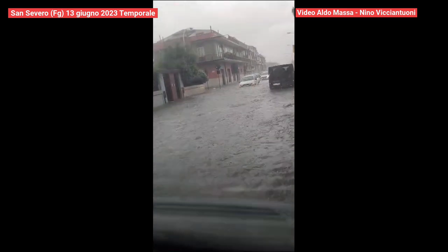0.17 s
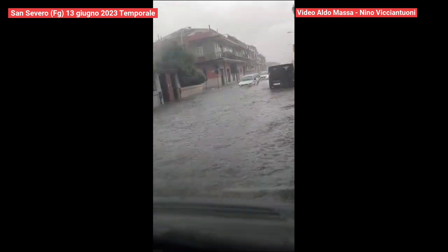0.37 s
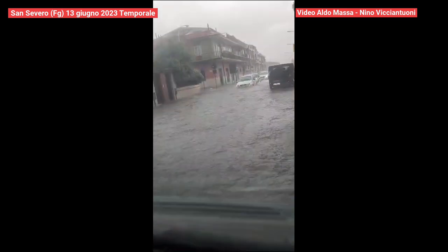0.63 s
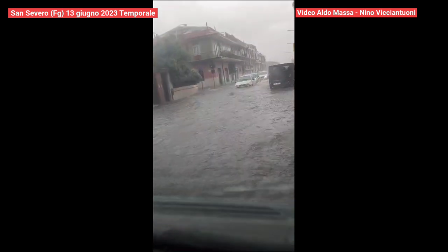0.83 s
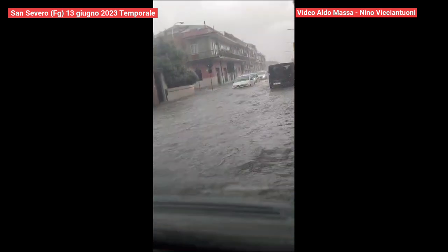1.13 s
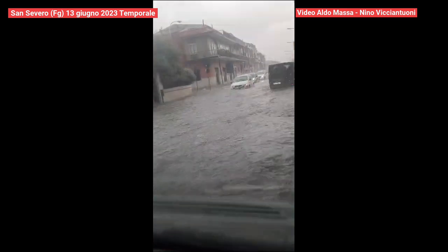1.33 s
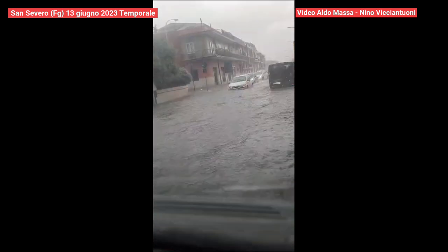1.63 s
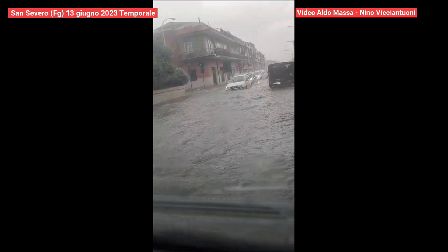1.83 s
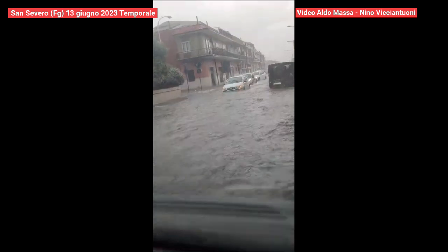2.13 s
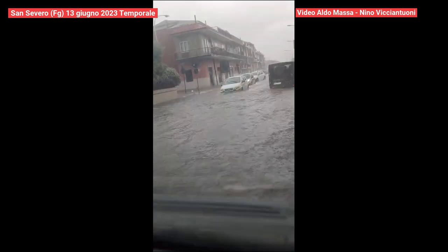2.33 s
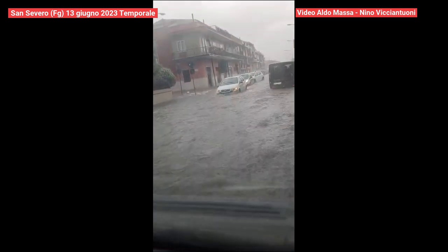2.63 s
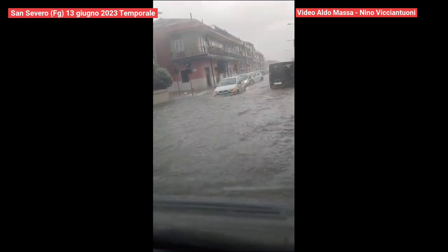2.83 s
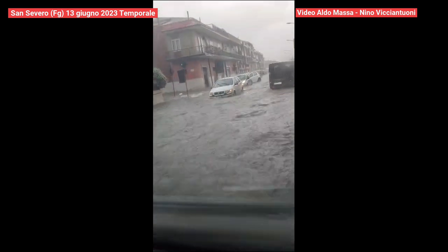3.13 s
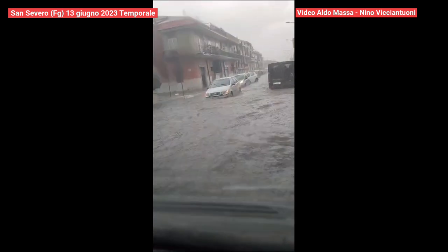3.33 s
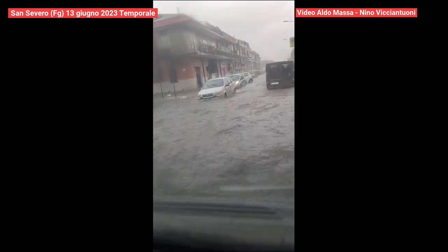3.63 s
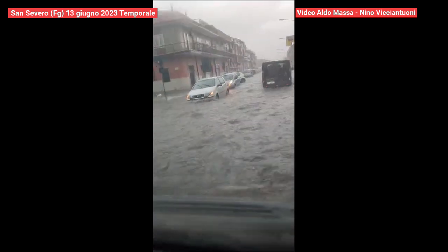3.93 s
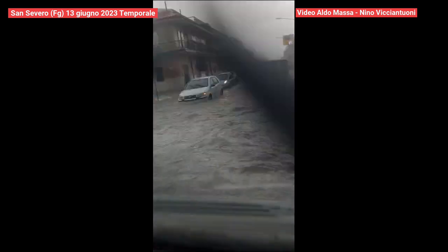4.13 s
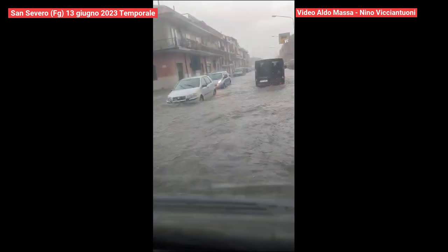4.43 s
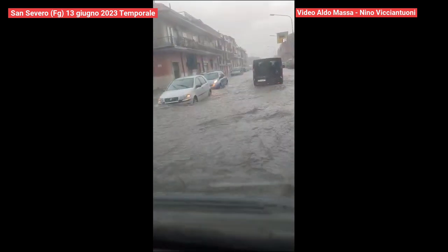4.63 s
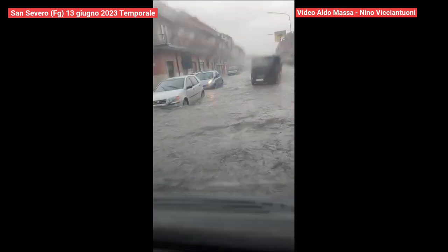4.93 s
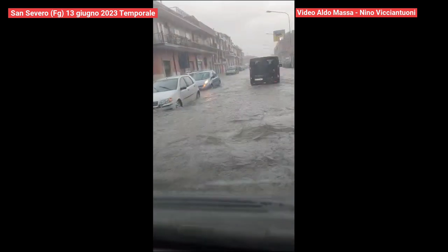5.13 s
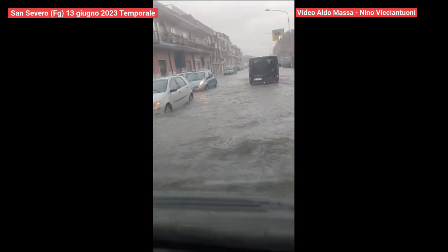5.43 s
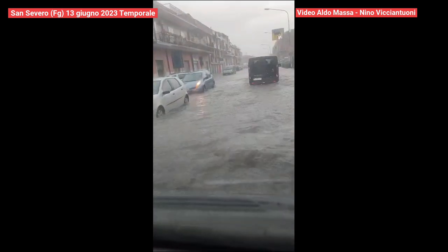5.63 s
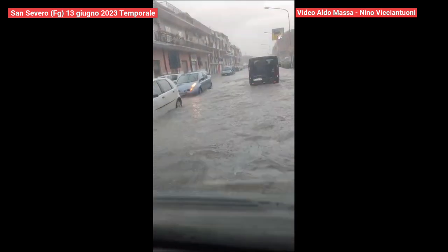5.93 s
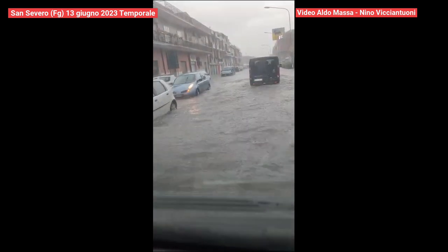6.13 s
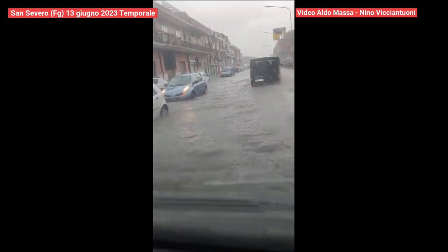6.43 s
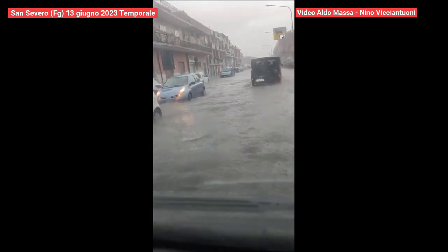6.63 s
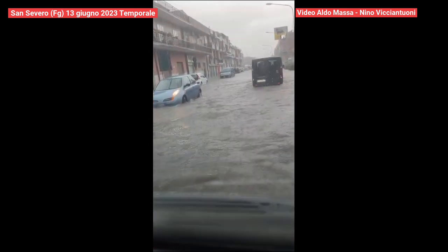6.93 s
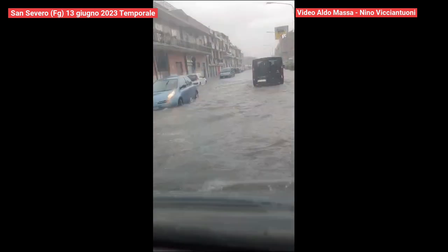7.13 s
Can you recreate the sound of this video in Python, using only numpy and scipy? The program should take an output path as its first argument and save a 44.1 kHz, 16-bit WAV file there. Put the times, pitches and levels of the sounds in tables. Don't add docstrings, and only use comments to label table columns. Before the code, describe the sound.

Low muffled rumble of water beneath a slow car, steady engine and fan drone, faint rain and spray, ticking relay, dull thuds and drops on glass.

```python
import sys
import numpy as np
from scipy import signal
from scipy.fft import rfft, irfft, next_fast_len
from scipy.io import wavfile
from scipy.ndimage import uniform_filter1d

SR = 44100
rng = np.random.default_rng(int(sys.argv[2]) if len(sys.argv) > 2 else 0)


def unload_wav(signal):
    wavfile.write(
        sys.argv[1],
        SR,
        np.round(np.clip(np.atleast_2d(signal).T, -1, 1) * 32767).astype(np.int16),
    )


def invert_db(level):
    return 10 ** (np.asarray(level, dtype=float) / 20)


N = 320739
TIME = np.arange(N) / SR
HZ = np.fft.rfftfreq(next_fast_len(N), 1 / SR)

# start_s, peak_db, panel_hz, second_panel_hz, second_panel_db
THUMP_EVENTS = [(0.139, -17.5, 121, 155, -15), (0.418, -15, 115, 169, -6), (0.952, -26, 124, 150, -21),
                (1.198, -18, 119, 160, -10), (1.359, -16.5, 115, 152.5, 2.5),
                (1.699, -24.5, 138, 170.5, -2), (2.339, -15.5, 108.5, 148, -16),
                (3.295, -11.5, 123, 148, -12), (4.247, -12, 119.5, 150, -15), (5.2, -12, 110.8, 166, -22),
                (5.58, -18.5, 123, 160, -9), (6.15, -13, 121, 169.4, -20), (6.499, -20, 105.3, 157, 1),
                (7.119, -14, 110, 169, -4.5)]


def on_hz(table):
    hz, value = np.transpose(table)
    return np.interp(np.log(HZ + 1), np.log(hz + 1), value)


def curves(table):
    s, *columns = np.transpose(table)
    return [np.interp(TIME, s, column) for column in columns]


def walk(rate):
    hold = int(SR / rate)
    steps = np.repeat(rng.standard_normal(N // hold + 1), hold)
    return 1.2 * uniform_filter1d(uniform_filter1d(steps, hold), hold)[:N]


def sides(db):
    return invert_db(np.array([db, -db]) / 2)


def pan(db):
    return sides(np.array([db]))


def place(out, s, sound):
    k = int(s * SR)
    return out + np.pad(sound[:, :N - k], ((0, 0), (k, max(N - k - sound.shape[1], 0))))


def blower():
    # multiple, rms_db, left_minus_right_db
    shaft_orders = [(2, -33.5, -2), (3, -28.5, 7), (4, -36.5, 11), (5, -39.5, 3.5), (6, -41.5, -6),
                    (7, -50, 0), (8, -48, -2), (9, -46, -6), (10, -55, -12)]
    shaft_hz = 59.35
    turn = 2 * np.pi * np.cumsum(shaft_hz * (1 + 0.0029 * walk(3))) / SR
    hum = 0
    for k, db, side_db in shaft_orders:
        level = np.sqrt(2) * invert_db(db + 0.92 * walk(7))
        hum = hum + level * np.sin(k * turn + k ** 2) * pan(side_db)
    return hum


def engine():
    # time_s, firing_rate_hz
    firing_rate = [(0, 57.6), (2, 56.45), (2.5, 55.04), (4, 55.12), (5, 53.85), (6, 51.92), (7.27, 51.66)]
    first_db, octave_db, boom_db_per_hz = -28.5, -28, 1.12
    hz = curves(firing_rate)[0]
    turn = 2 * np.pi * np.cumsum(hz * (1 + 0.0118 * walk(10))) / SR
    firing = np.sin(turn) * invert_db(first_db + boom_db_per_hz * (hz[0] - hz) + walk(9))
    octave = np.sin(2 * turn) * invert_db(octave_db + walk(9))
    return np.sqrt(2) * (firing + octave) * pan(1.2)


def waves():
    # centre_s, peak_db, pitch_hz, length_s
    lifts = [(0.326, -19, 21, .3), (.95, -28, 30, 0.18), (1.918, -17.5, 33.6, .3), (2.472, -22, 29.5, .2),
             (2.924, -16, 28.1, .3), (3.48, -11.5, 21.95, .35), (4.052, -21, 23, 0.26),
             (5.233, -26, 32, .15), (6.304, -21, 22, .3)]
    out = np.zeros((2, N))
    for s, db, hz, length in lifts:
        t = TIME[:int(length * SR)]
        swing = invert_db(db) * np.sin(np.pi * t / length) ** 2 * np.sin(2 * np.pi * hz * t)
        out = place(out, s - length / 2, np.array([swing, swing]))
    return out


def unit(sound):
    return sound / np.std(sound[..., :400], axis=-1, keepdims=True)


def relay():
    # start_s, level_db over the usual
    closings = [(.2533, -2), (1.2097, 0), (2.1636, 0), (3.1205, -.5), (4.0771, 0), (5.0308, .5),
                (5.9873, 0), (6.9426, 0)]
    # pitch_hz, left_db, right_db, t60_s
    housing = [(2050, -1, -9, .03), (2350, 0, 0, .025), (2520, -2, -1, .02), (2680, 1, 1, .03),
               (2880, -2, 1, .03), (3070, -6, -3, .025), (3280, 0, 2, .04), (3900, -17, -16, .015),
               (4750, -12, -12, .02), (6140, -18, -10, .015), (6580, -18, -10, .015)]
    click_db, snap_db = -26.5, -11.5
    chatter_s, cabin_share, cabin_s, snap_s = .009, .55, .022, .006
    new_share = .2
    t = TIME[:SR // 12]
    hz, left, right, t60 = np.transpose(housing)[:, :, None]
    ring = np.sin(2 * np.pi * hz * t) * invert_db(-60 * t / t60)
    weight = invert_db(np.array([left, right]))
    attack = 1 - np.exp(-t / .0003)
    chatter = attack * (np.exp(-(t / chatter_s) ** 2) + cabin_share * np.exp(-t / cabin_s))
    contact = signal.butter(4, (4400, 7300), "band", fs=SR, output="sos")
    mount = signal.butter(6, (1980, 7600), "band", fs=SR, output="sos")
    habit = rng.standard_normal((2, len(housing), 2 * len(t)))
    out = np.zeros((2, N))
    for s, db in closings:
        rattle = habit + new_share * rng.standard_normal(habit.shape)
        modes = signal.fftconvolve(rattle, ring[None], "valid", axes=2)[..., :len(t)] * chatter
        snap = signal.sosfilt(contact, rattle[:, 0])[:, -len(t):] * attack * np.exp(-t / snap_s)
        body = unit((weight * unit(modes)).sum(1)) * pan(-3.)
        strike = body + unit(snap) * invert_db(snap_db) * pan(-7.)
        out = place(out, s - .0006, signal.sosfilt(mount, strike) * invert_db(click_db + db) * pan(2))
    return out


def wipers():
    t, out = TIME[:SR // 4], np.zeros((2, N))
    swing = (1 - np.exp(-t / 0.015)) * invert_db(-60 * t / 0.16)
    for s, db, hz, upper_hz, upper_db in THUMP_EVENTS:
        body = np.sin(2 * np.pi * hz * t) + invert_db(upper_db) * np.sin(2 * np.pi * upper_hz * t)
        out = place(out, s, invert_db(db + 12.5) * swing * body * pan(.8))
    return out


def drops():
    # start_s, peak_db, brightness_db, left_minus_right_db
    fat_drops = [(0.4334, -27, -29, 4), (0.6704, -34, -23, -1.0), (0.816, -28, -22, -1.5),
                 (1.4504, -38, -22, -5), (1.4995, -31, -33, 2), (1.5509, -34, -27, -1.0),
                 (1.6237, -30, -27, -5), (1.764, -23, -28, 1), (1.8956, -26, -27, 0.0),
                 (1.9864, -35, -20, -3), (2.3594, -28, -27, 2), (2.3894, -26, -30, -1.0),
                 (3.7683, -31, -26, -0.5), (4.2774, -26, -28, 4), (4.3094, -36, -24, -3),
                 (4.6084, -31, -32, -0.5), (4.8404, -39, -21, 3), (5.0878, -22, -27, 0),
                 (5.1134, -28.5, -24, -10), (5.3522, -25, -32, -1.0), (5.5134, -33, -17, -6)]
    near_drops = [
        (4.1879, -27, -15, -5),
        (4.9447, -36, -5, -2),
    ]
    t, out = TIME[:SR // 25], np.zeros((2, N))
    knock_band = signal.butter(2, (1900, 3700), "band", fs=SR, output="sos")
    splash_band = signal.butter(2, (3800, 15500), "band", fs=SR, output="sos")
    for s, db, bright_db, side_db in list(fat_drops) + list(near_drops):
        burst = rng.standard_normal((2, 2, len(t)))
        knock = signal.sosfilt(knock_band, burst[0] * np.exp(-t / 0.0046)) * invert_db(4.0)
        impact = (t == 0) * 2.5 + .3 * burst[1] * np.exp(-t / .0009)
        splash = signal.sosfilt(splash_band, impact) * invert_db(bright_db + 9.0) * pan(-14.)
        out = place(out, s, invert_db(db) * (knock * pan(side_db) + splash))
    return out


def patter(rate, scatter_db, share, tail_s):
    hit = rng.random((2, N)) < rate / SR
    size = invert_db(scatter_db * np.minimum(rng.exponential(size=(2, N)), 2.5))
    envelope = signal.lfilter([1], [1, -np.exp(-1 / (tail_s * SR))], hit * size)
    envelope = envelope / np.sqrt(np.mean(envelope ** 2))
    share = np.clip(share, 0, 1)
    return rng.standard_normal((2, N)) * np.sqrt(1 - share + share * envelope ** 2)


def cabin_resonances():
    # pitch_hz, width_hz, left_db, right_db
    cabin_peaks = [(1970, 130, 3, 0), (3230, 160, -2, 3), (4800, 89, 4, 3), (6170, 170, -2, 0.5),
                   (6470, 270, 5.5, 0), (7200, 130, 4.5, 3.5)]
    db = 0
    for hz, width, left, right in cabin_peaks:
        db = db + np.array([[left], [right]]) / (1 + (2 * (HZ - hz) / width) ** 2)
    return invert_db(db)


def water(colour, level_db, drive, swell_db, flicker_db, flicker_rate):
    # pitch_hz, left_minus_right_db
    port_tilt = [(30, -4), (80, 5), (200, -0.5), (450, 4.5), (700, -1), (900, -2.5), (1300, 0.5),
                 (3000, -1.5), (4700, -5.5), (6000, -13.5), (7200, -5), (7700, 1.5), (8600, 14),
                 (10300, -1.5), (12000, -9), (14000, -21)]
    # pitch_hz, likeness (-1 to 1)
    likeness = [(30, 0.45), (250, 0.54), (650, 0.88), (900, 0.66), (1050, -0.28), (1300, -0.38),
                (1900, -0.19), (2400, 0.35), (3300, -0.12), (4000, 0.39), (5100, -0.13), (6000, .1),
                (6300, .8), (7300, 0.86), (7700, 0.86), (9000, 0.57), (10500, 1), (11800, .7), (12200, .25),
                (13000, 0.092)]
    alike = np.clip(on_hz(likeness), -.98, .98)
    same, other = rfft(drive, next_fast_len(N))
    same, other = same * np.sqrt(1 + alike), other * np.sqrt(1 - alike)
    gain = sides(on_hz(port_tilt))
    gain = gain / np.sqrt(gain[0] ** 2 + gain[1] ** 2 + 2 * alike * gain[0] * gain[1])
    full = gain * cabin_resonances() * invert_db(on_hz(colour)) * np.array([same + other, same - other])
    thirds = 3 * np.log2(HZ + 1)
    first, last = 3 * np.log2(np.array(colour)[[0, -1], 0])
    out, swell = 0, walk(5.11)
    for centre in np.arange(np.floor(first), last + 1):
        band = irfft(full * np.clip(1 - abs(thirds - centre), 0, 1))[:, :N]
        out = out + band * invert_db(swell_db * swell + flicker_db * walk(flicker_rate))
    return out * invert_db(level_db) / np.std(out.mean(0))


def mist(wash, gust):
    # pitch_hz, level_db per Hz
    mist_colour = [(7000, -30), (8600, 2), (9500, -0.5), (10600, -4.5), (13500, -3), (15600, -4),
                   (15900, -40)]
    level_db = -61 + 0.54 * wash + 1.7 * gust
    return water(mist_colour, level_db, patter(150, 3.1, 0.21, 0.0045), 0.54, 0.76, 12)


def rain(wash, gust):
    # pitch_hz, level_db per Hz
    rain_colour = [(2240, -23), (3800, -2), (4310, -4), (4680, -3), (5020, -6.5), (5920, -1.5),
                   (7040, -1.5), (8020, -5.5), (9000, -20), (11700, -50), (19800, -120)]
    level_db = -43 + .3 * wash + 1.1 * gust
    return water(rain_colour, level_db, patter(300, 2.6, 0.16, 0.0037), 0.38, 0.25, 15)


def spray(wash, gust):
    # pitch_hz, level_db per Hz
    spray_colour = [(880, -18), (1500, -4.5), (1880, -2), (2300, 3.5), (2680, 3), (3050, -0.5), (3280, -2),
                    (3550, -6.5), (4000, -9), (5200, -18), (8800, -120)]
    return water(spray_colour, -43.5 + wash + gust, patter(320, 2.2, 0.26, 0.004), 0.35, 1.0, 12)


def heave():
    # pitch_hz, level_db per Hz
    heave_colour = [(12, -30), (19, 10), (24, 8), (32, 3), (40, 3), (48, 0), (60, -60)]
    deep_s, deep_span_s = 3.2, 0.57
    deep = np.exp(-((TIME - deep_s) / deep_span_s) ** 2)
    return water(heave_colour, -28 + 4 * deep, rng.standard_normal((2, N)), .3, 0.95, 3.8)


def slosh(wash, shake):
    # pitch_hz, level_db per Hz
    slosh_colour = [(240, -25), (400, -2.5), (443, -10.5), (611, -1), (702, -6), (769, -4.5), (817, -9.5),
                    (889, -6.5), (1230, -16), (1700, -20), (2210, -39), (3740, -120)]
    level_db = -32 + 0.47 * wash + 0.7 * shake
    return water(slosh_colour, level_db, patter(200, 2.9, 0.17, 0.0085), 1.0, 0.69, 10)


def surge(shake):
    # pitch_hz, level_db per Hz
    surge_colour = [(26, -30), (45, -2), (178, -4.5), (219, -9), (293, -8), (480, -21.5), (620, -29),
                    (1060, -120)]
    return water(surge_colour, -21 + 2 * shake, patter(44, 9.0, 0.2, 0.013), 0.09, 0.57, 7.4)


def judder():
    lag_s, span_s = 0.03, 0.067
    loudest_db = max(row[1] for row in THUMP_EVENTS)
    shake = 0
    for s, db, *_ in THUMP_EVENTS:
        shake = shake + invert_db(db - loudest_db) ** .5 * np.exp(-((TIME - s - lag_s) / span_s) ** 2)
    return shake


def flood():
    # time_s, level_db over the usual
    wheel_wash = [(0, 0), (.63, 1.5), (1.15, -0.5), (1.78, 2.5), (2.38, 0), (2.5, -3), (2.81, -3.5),
                  (3.14, -3), (3.85, 0), (4.29, 4.5), (4.76, 1), (5.69, -1), (6.3, 1.5), (6.8, -2.5),
                  (7.27, -1.5)]
    wash, shake = curves(wheel_wash)[0], judder()
    gust = 0.53 * walk(14)
    high = mist(wash, gust) + rain(wash, gust) + spray(wash, gust)
    return high + heave() + slosh(wash, shake) + surge(shake)


def scene():
    return blower() + engine() + waves() + relay() + wipers() + drops() + flood()


def starve(x):
    share = np.where(TIME < 4.05, .09, .38) * np.array([[.12], [1]])
    hold = 2048
    out, spectrum = x, rfft(x, next_fast_len(N))
    for low_hz, high_hz in ((8300, 8650), (8650, 8950), (8950, 9300), (9300, 9650)):
        band = irfft(spectrum * ((HZ > low_hz) & (HZ <= high_hz)))[:, :N]
        lost = np.repeat(rng.random((2, N // hold + 1)), hold, axis=1)[:, :N] < share
        out = out - band * uniform_filter1d(1. * lost, size=400)
    edge = irfft(rfft(out, next_fast_len(N)) * ((HZ > 7600) & (HZ < 9700)))[:, :N]
    thinned = np.repeat(rng.random(N // hold + 1), hold)[:N] < .2
    return out - 0.4 * edge * uniform_filter1d(1. * thinned, size=600)


def low_pass(x):
    return signal.sosfilt(signal.butter(12, 16240, fs=SR, output="sos"), x)


def record(dry):
    x = signal.sosfilt(signal.butter(2, 17, "high", fs=SR, output="sos"), dry)
    x = np.tanh(1.1 * x) / 1.1
    x = signal.sosfilt(signal.ellip(10, .2, 70, 15720, fs=SR, output="sos"), x)
    x = x * np.clip((N / SR - TIME) / .004, 0, 1)
    return low_pass(starve(x))


dry = scene()
out = record(dry)
unload_wav(out)
```